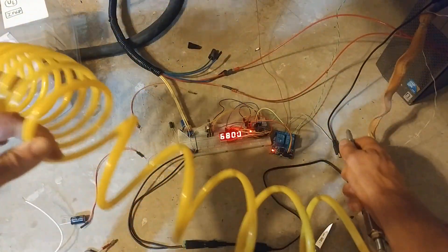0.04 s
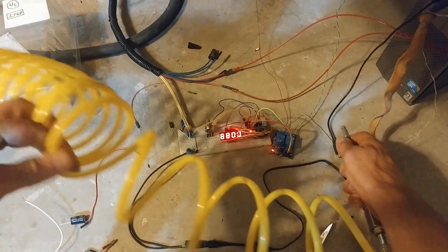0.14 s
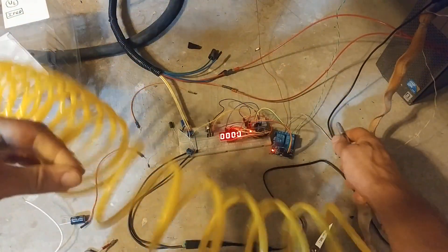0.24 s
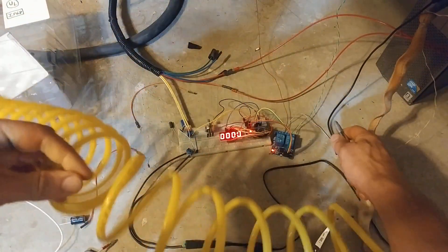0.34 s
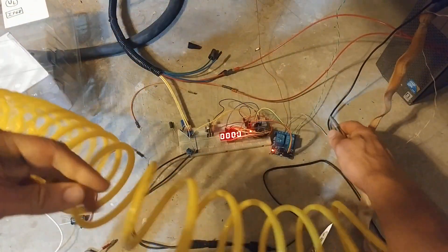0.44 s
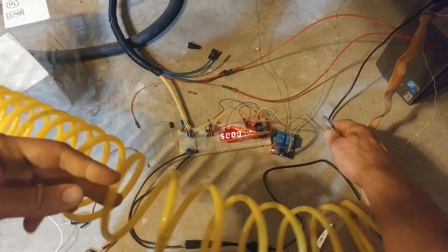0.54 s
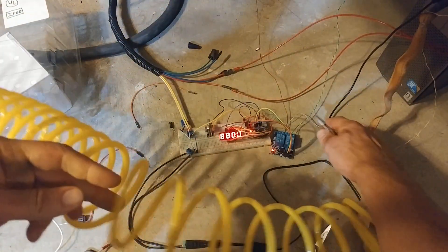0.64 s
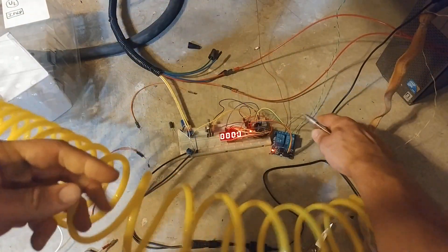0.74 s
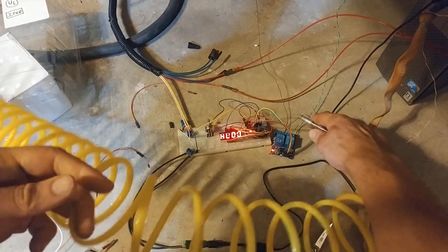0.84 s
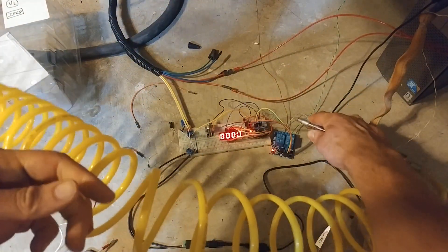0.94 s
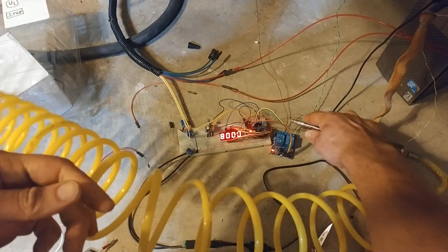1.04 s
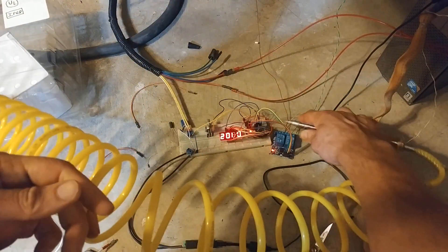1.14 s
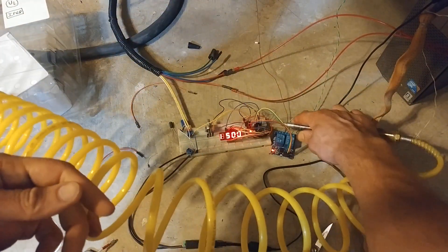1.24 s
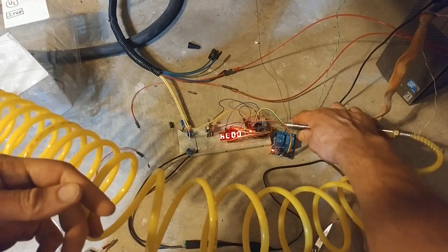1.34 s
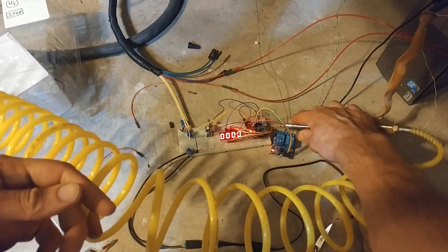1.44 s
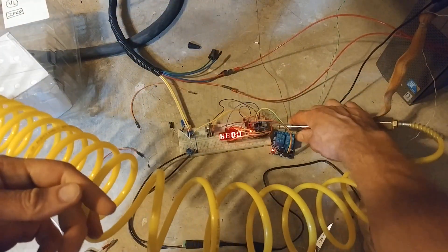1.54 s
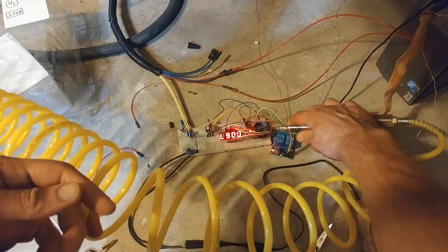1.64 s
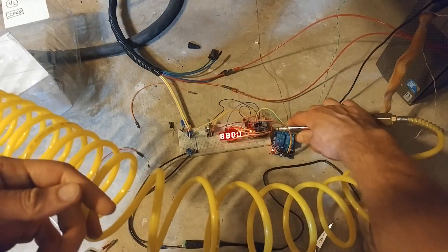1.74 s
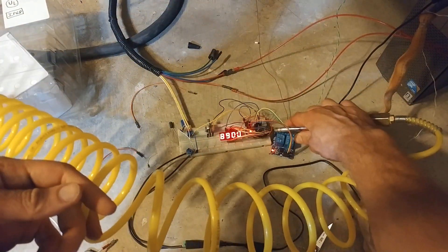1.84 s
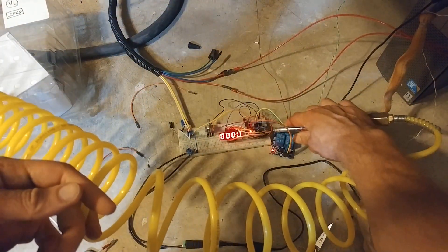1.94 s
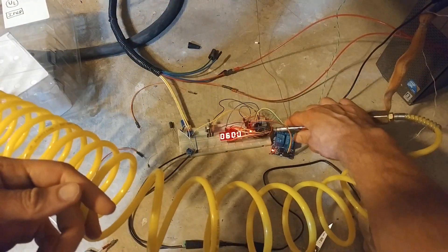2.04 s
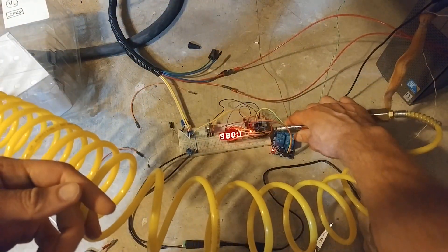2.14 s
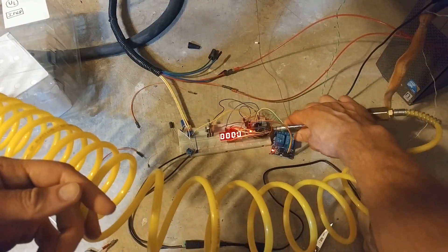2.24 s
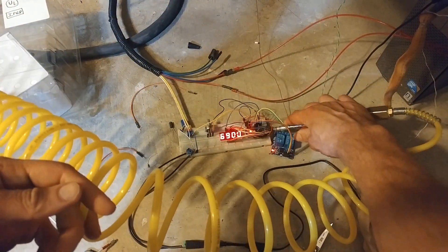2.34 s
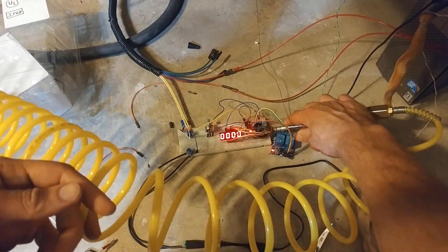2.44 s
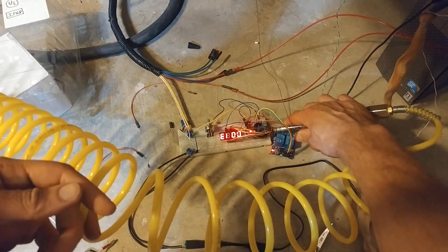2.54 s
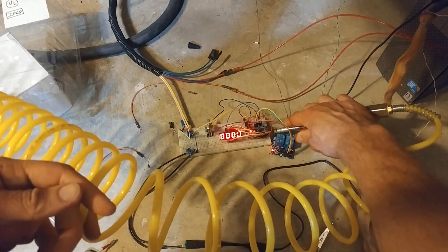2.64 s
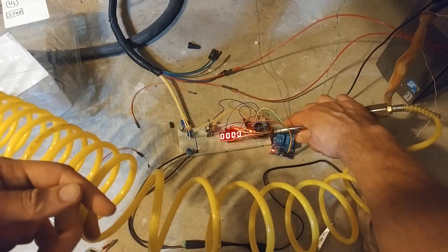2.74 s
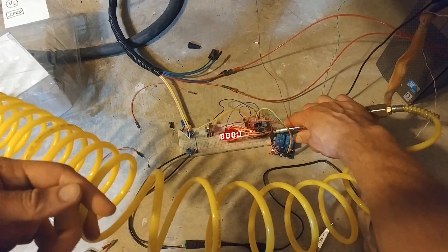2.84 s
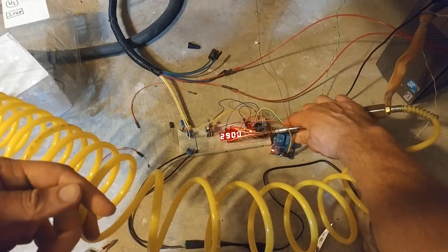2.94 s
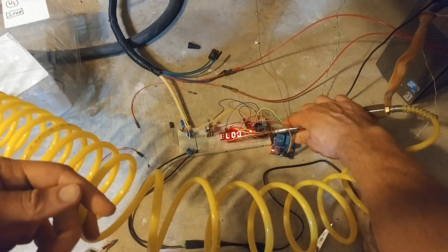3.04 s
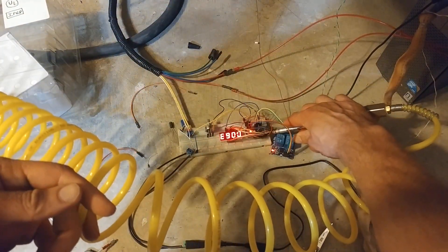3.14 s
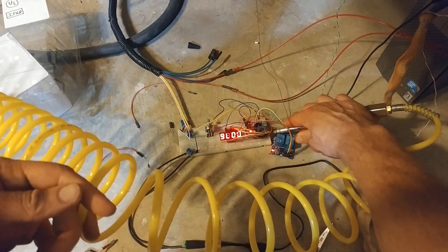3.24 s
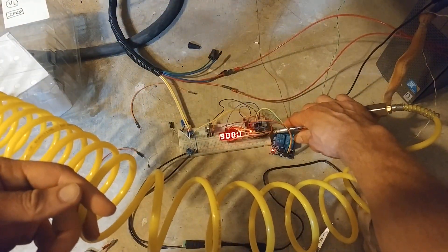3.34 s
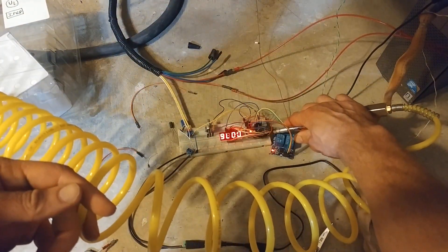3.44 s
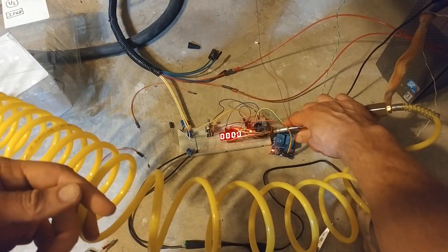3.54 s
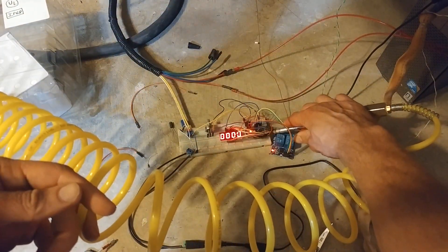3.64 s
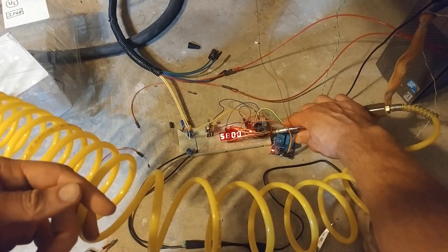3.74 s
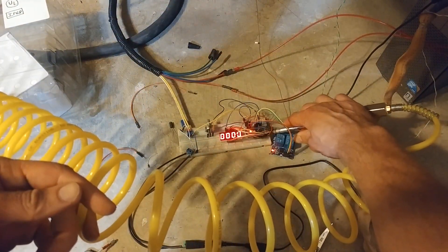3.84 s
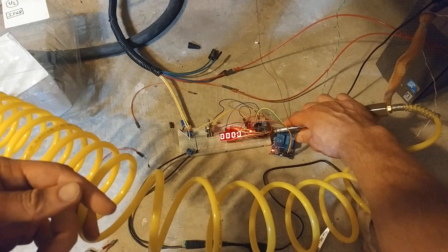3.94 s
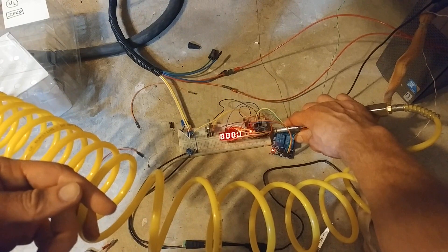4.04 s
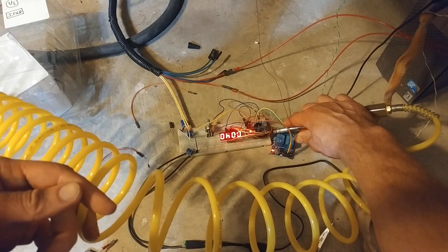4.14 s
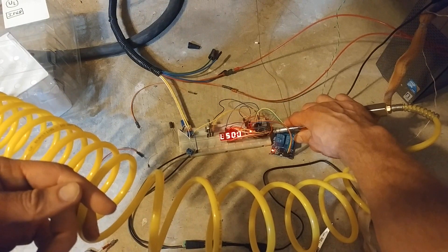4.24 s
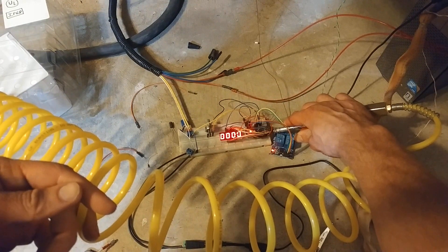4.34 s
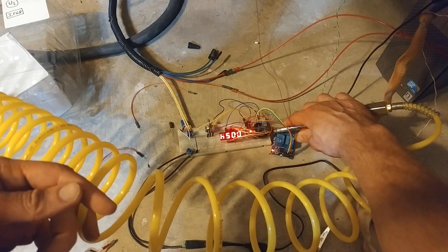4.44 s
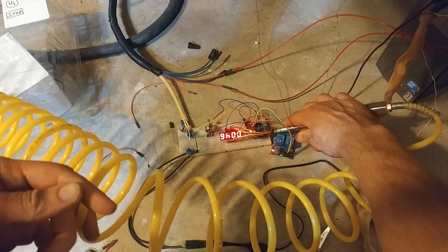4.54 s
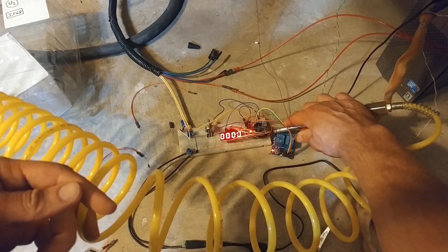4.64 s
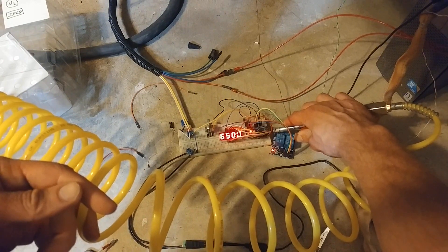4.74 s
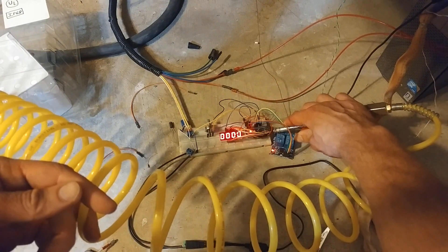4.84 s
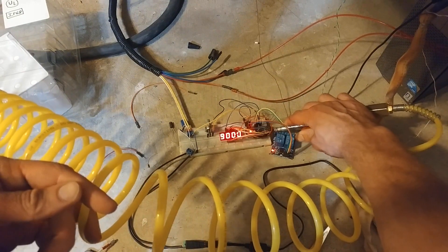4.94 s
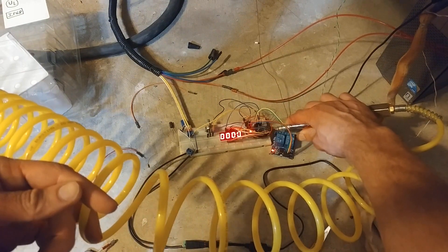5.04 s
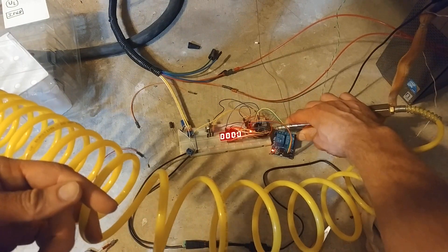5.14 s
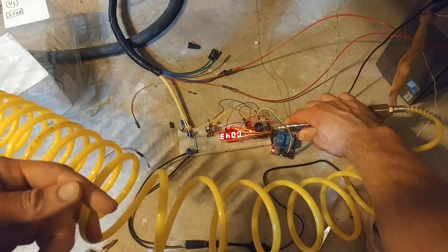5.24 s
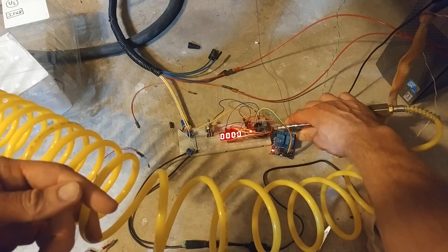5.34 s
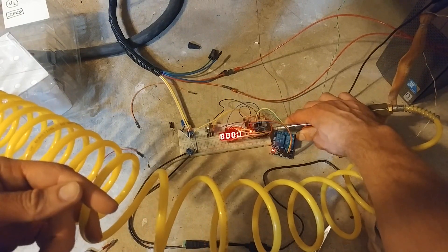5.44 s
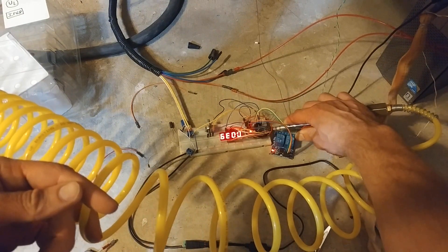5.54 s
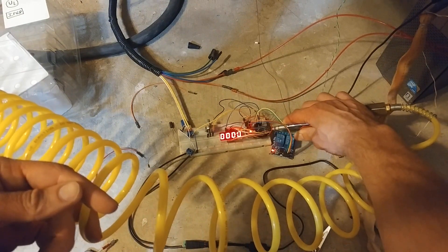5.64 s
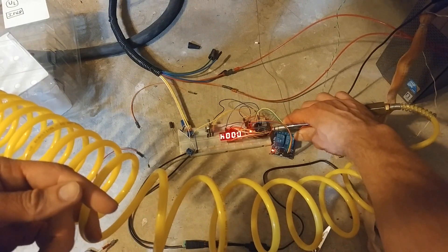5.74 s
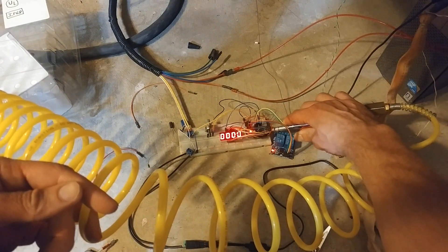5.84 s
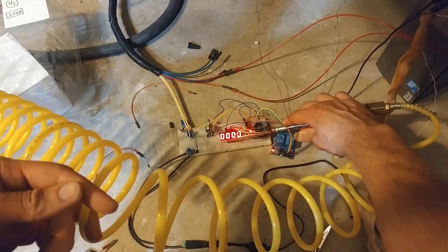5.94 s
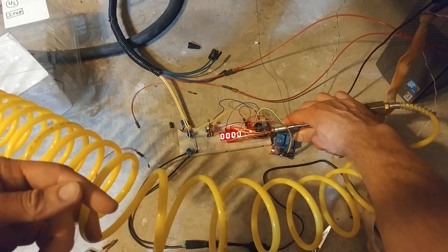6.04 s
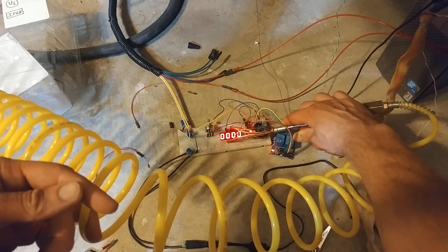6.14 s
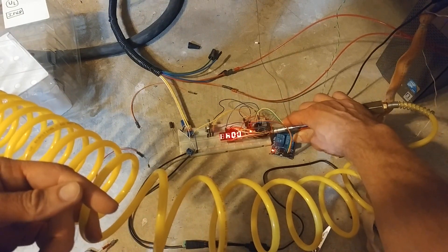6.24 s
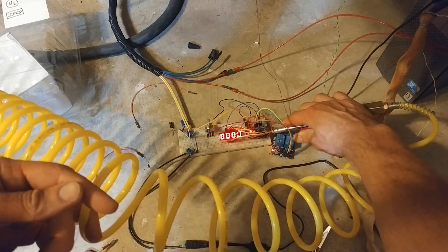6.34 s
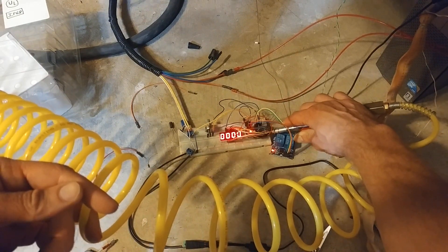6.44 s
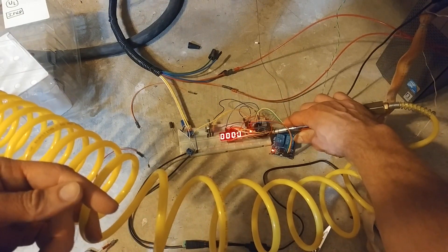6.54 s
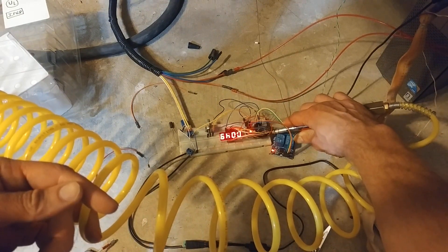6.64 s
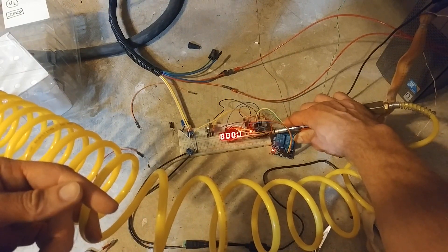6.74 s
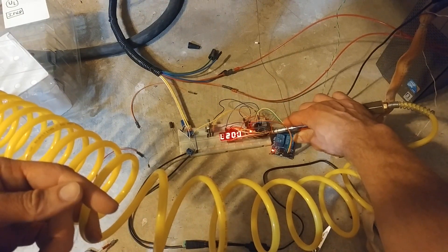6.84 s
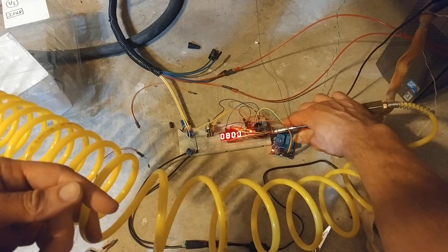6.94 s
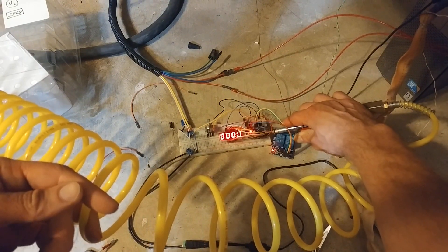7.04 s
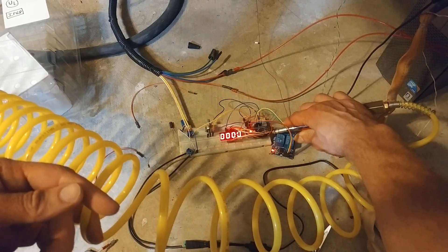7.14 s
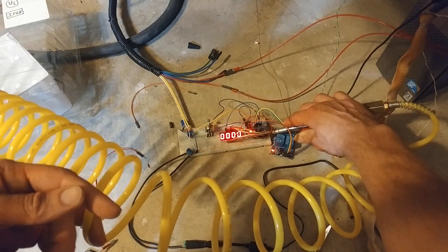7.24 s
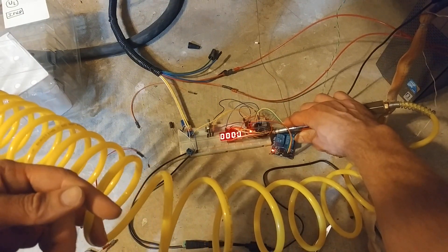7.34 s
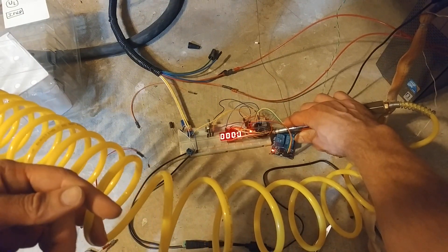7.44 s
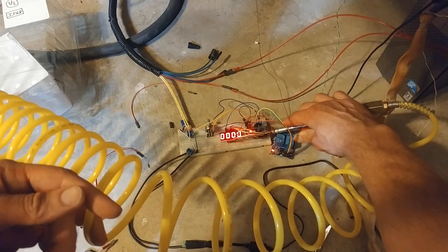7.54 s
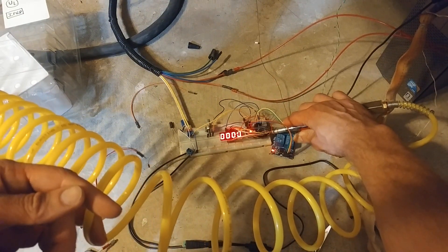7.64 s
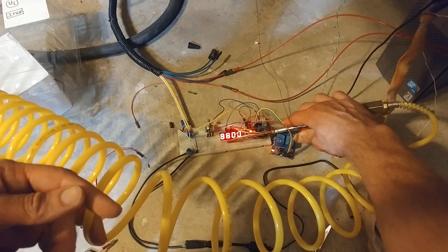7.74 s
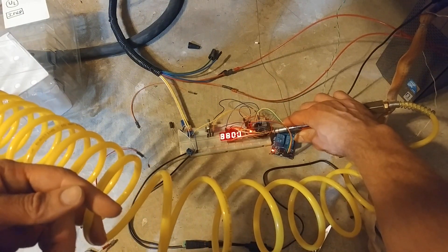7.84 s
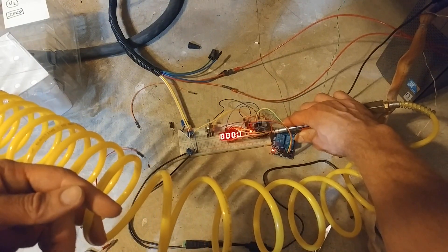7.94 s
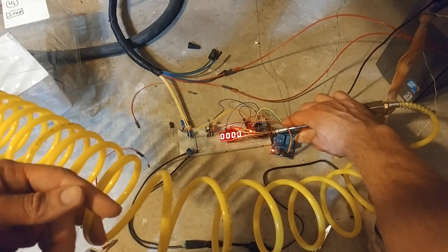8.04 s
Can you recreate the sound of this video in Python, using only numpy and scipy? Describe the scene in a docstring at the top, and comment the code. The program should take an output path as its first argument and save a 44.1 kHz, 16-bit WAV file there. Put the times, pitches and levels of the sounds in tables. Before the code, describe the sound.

Close, high air hiss from a blow gun, starting with a blast and hose thumps, then surging and fluttering over a circuit board.

```python
"""A jet of air from a blow gun hisses in the open, then is brought up to a circuit board,
where it breaks on the parts, roars, spits and sings in the gaps.
As the gun is opened over the workbench, its valve ticks and its coiled hose thumps.
A faint leak, a machine hum and the rumble of the room lie underneath. It is all heard from close by."""
import sys
import numpy as np
from scipy import signal
from scipy.fft import rfft, irfft
from scipy.io import wavfile
from scipy.ndimage import uniform_filter1d, map_coordinates

SR = 44100
rng = np.random.default_rng(int(sys.argv[2]) if len(sys.argv) > 2 else 0)


def wav_out(sig):
    """Save sig, one row per channel (or a flat mono array), as 16-bit PCM at SR to the path in sys.argv[1]."""
    wavfile.write(sys.argv[1], SR, np.round(np.clip(np.atleast_2d(sig).T, -1, 1) * 32767).astype(np.int16))


N = 356328
TIME = np.arange(N) / SR
FREQS = np.fft.rfftfreq(N, 1 / SR)
OPEN_S, LAND_S, PARTS_S = 0.098, 1.35, 1.68  # the air starts, meets the board, reaches the small parts


def from_db(db):
    """Turn decibels into a number to multiply by."""
    return 10 ** (np.asarray(db) / 20)


def unit_power(x):
    """Scale a signal so that its average power is 1."""
    return x / np.sqrt(np.mean(x ** 2) + 1e-20)


def curves(rows):
    """Join a table's points with straight lines: one curve for each column after the time."""
    times, *columns = np.transpose(rows)
    return [np.interp(TIME, times, column) for column in columns]


def noise(colour):
    """Steady noise shaped by rows of (pitch_hz, level_db), fading 20 dB an octave past their ends."""
    hz, db = np.transpose(colour)
    octave = np.log2(FREQS + 1)
    outside = np.abs(octave - np.clip(octave, np.log2(hz[0]), np.log2(hz[-1])))
    gain = from_db(np.interp(octave, np.log2(hz), db) - 20 * outside)
    return unit_power(irfft(rfft(rng.standard_normal(N)) * gain, N))


def drift(rate_hz):
    """A random wobble of about size 1; a higher rate makes it quicker."""
    return unit_power(irfft(rfft(rng.standard_normal(N)) / (1 + (FREQS / rate_hz) ** 2), N))


def retuned(x, ratio):
    """Slide a noise up or down in pitch by running it faster or slower."""
    return map_coordinates(x, [np.cumsum(ratio) % (N - 1)], order=3, mode="nearest")


def clicks(events):
    """One click for each row of (start_s, level_db)."""
    out = np.zeros(N)
    for start_s, level_db in events:
        out[round(start_s * SR)] += from_db(level_db)
    return out


def puffs(events, decay_s):
    """A loudness curve that jumps up at each event and dies away."""
    envelope = signal.lfilter([1], [1, -np.exp(-1 / (decay_s * SR))], clicks(events) + 1e-18)
    return uniform_filter1d(envelope, size=40)


def struck(hits, notes, vary_db):
    """Each hit rings all of an object's notes, which fade 60 dB in ring_s; hard hits are brighter."""
    out = np.zeros(N)
    start_s, hit_db, hardness = np.transpose(hits)
    chance = rng.standard_normal((len(hits), len(notes)))
    for k, (hz, note_db, ring_s) in enumerate(notes):
        level_db = hit_db + note_db + hardness * np.log2(hz / notes[0][0]) + vary_db * chance[:, k]
        taps = clicks(zip(start_s, level_db)) + 1e-18
        fade, angle = from_db(-60 / (ring_s * SR)), 2 * np.pi * hz / SR
        out += (-1) ** k * signal.lfilter([0, np.sin(angle)], [1, -2 * fade * np.cos(angle), fade ** 2], taps)
    return out


def room_echoes(x, echo_db, ring_s):
    """Add a wash of quickly dying echoes from the bench and the walls."""
    t = TIME[:SR // 2]
    tail = rng.standard_normal(len(t)) * from_db(-60 * t / ring_s) * (t > .001)
    response = from_db(echo_db) * tail / np.linalg.norm(tail)
    response[0] = 1
    return signal.fftconvolve(x, response / np.linalg.norm(response))[:N]


# Tone colour of the room's rumble and of the leak: pitch_hz, level_db
RUMBLE_COLOUR = [(20, 1.5), (40, -0.5), (85, 0.5), (130, -0.5), (200, -5), (240, -1.5), (320, 1.5),
                 (380, 0), (480, -6), (800, -13.5), (1500, -12.5), (2200, -18.5), (3300, -48), (12000, -32)]
LEAK_COLOUR = [(3000, -8.5), (4700, -11.5), (6400, 0), (8200, -7), (10000, -19), (13000, -41)]
# The notes a machine hums: pitch_hz, level_db
HUM_NOTES = [(59.5, -89), (260, -72.5), (355, -82)]
def workshop(rumble_db, leak_db, waver_hz):
    """A slowly fading room rumble, a slight leak of air and a wavering machine hum."""
    hum = np.zeros(N)
    for hz, db in HUM_NOTES:
        phase = 2 * np.pi * np.cumsum(hz + waver_hz * drift(3.9)) / SR
        hum += from_db(db) * np.sqrt(2) * np.sin(phase)
    rumble = from_db(rumble_db - 0.7 * TIME) * noise(RUMBLE_COLOUR)
    return rumble + from_db(leak_db) * noise(LEAK_COLOUR) + hum


# Knocks as the hose jerks: start_s, level_db, hardness_db_per_octave
HOSE_KNOCKS = [(0.13, -34, -3.5), (0.149, -37.5, -7), (0.177, -43, 1), (0.213, -56, 0), (0.258, -58, -1),
               (0.431, -50, 0), (0.529, -41.5, -0.5), (0.535, -48, 7), (0.643, -53, 3), (0.751, -58, 4),
               (0.967, -52.5, 1)]
# The notes of the hose on the bench: pitch_hz, level_db, ring_s
HOSE_NOTES = [(298, -11, 0.054), (354, -2.5, 0.064), (584, -14, .03), (873, -5.5, 0.024),
              (1274, -10.5, 0.032), (1510, -17, .03)]
# Tone colour of the coils slapping: pitch_hz, level_db
SLAP_COLOUR = [(150, -20), (350, 15), (600, -10), (1000, -1), (1600, -4), (2400, -3), (4000, -28)]
def hose(slap_db, rustle_db):
    """The coils slap together with a short hollow ring and rustle on as they settle."""
    knocks = [(start_s, level_db) for start_s, level_db, _ in HOSE_KNOCKS]
    slap = from_db(slap_db) * puffs(knocks, decay_s=.006)
    rustle = from_db(rustle_db) * puffs(knocks, decay_s=.06)
    return (slap + rustle) * noise(SLAP_COLOUR) + struck(HOSE_KNOCKS, HOSE_NOTES, vary_db=-1.0)


# Ticks as the trigger is pulled: start_s, level_db, hardness_db_per_octave
VALVE_TICKS = [(0.095, -38, 4), (0.104, -42, 2)]
# The notes of the valve: pitch_hz, level_db, ring_s
VALVE_NOTES = [(3426, -17, 0.081), (6250, -4, 0.013), (6460, -3.5, 0.028), (9400, -18, .04)]
def valve():
    """The trigger valve ticks open and rings briefly."""
    return struck(VALVE_TICKS, VALVE_NOTES, vary_db=3.0)


def breathy_note(pitch_hz, level_db, width_hz):
    """Swirling air sounds a note: a narrow band of noise that fades in over a second."""
    phase = 2 * np.pi * np.cumsum(pitch_hz) / SR
    tone = unit_power(drift(width_hz) * np.cos(phase) + drift(width_hz) * np.sin(phase))
    return tone * from_db(level_db) * np.clip(TIME - OPEN_S, 0, 1)


def hollow_note(jet_db, surge_db, narrowing):
    """A hollow between the parts sings: surges raise its note, a narrower gap lowers and weakens it."""
    narrower_percent = 100 * (narrowing - 1)
    pitch_hz = (4308 + 22 * surge_db) * narrowing ** -1.3
    level_db = jet_db - 14 + 0.43 * surge_db - 1.46 * narrower_percent
    return breathy_note(pitch_hz, level_db, width_hz=400)


# The note of a narrow gap: time_s, pitch_hz, level_db (compared with the jet)
GAP_NOTE = [(0.9, 6702, -7), (1.2, 6698, -0.5), (1.4, 7046, 3.5), (1.8, 6761, 0), (2.2, 6718, -5.5),
            (3.4, 6993, -2.5), (4.5, 6896, -5), (5.6, 7118, -1.5), (6.8, 7224, -2.3), (8.0, 7209, -1.5)]
def singing_gap(jet_db):
    """The jet sings in a gap. Also gives the narrowing: above 1 when the note is higher than average."""
    pitch_hz, level_db = curves(GAP_NOTE)
    return breathy_note(pitch_hz, jet_db + level_db, width_hz=440), pitch_hz / pitch_hz.mean()


# The nozzle coming down to the bench: time_s, height_m
NOZZLE_HEIGHT = [(0.1, .31), (0.45, 0.249), (0.8, 0.22), (1.05, 0.19), (1.4, 0.056)]
def nozzle_path(lowest_db):
    """The nozzle's height and the level of its steady flow, 4 dB quieter at twice the height."""
    height_m, = curves(NOZZLE_HEIGHT)
    return height_m, lowest_db - 4 * np.log2(height_m / height_m.min())


# Tone colour of the first blast and of the steady flow: pitch_hz, level_db
BLAST_COLOUR = [(150, -17.5), (700, -24), (1400, -19), (2000, -20.5), (3100, -19), (4000, -12), (4800, -9),
                (5600, -1), (7200, 1), (8300, -1), (9900, -8.5), (11400, -22), (12900, -30), (16000, -30)]
FLOW_COLOUR = [(500, -13), (1500, -23), (2650, -31), (3000, -18.5), (3800, -20), (4450, -18), (5200, -5.5),
               (5900, -4), (7200, 0.5), (8400, -1.5), (9900, -11), (11000, -22), (12700, -34), (16000, -31)]
def free_jet(height_m, flow_db, blast_db, echo_db):
    """Pressure stored in the hose leaves as a blast, then a smooth flow that dies at the board."""
    rise_s, hold_s, drain_db_per_s = 0.033, 0.1, 45
    end_s, end_db_per_s = 1.455, 450
    age_s = TIME - OPEN_S
    opening = np.clip(age_s / rise_s, 0, 1)
    blast = from_db(blast_db - drain_db_per_s * np.maximum(age_s - rise_s - hold_s, 0))
    flow = from_db(flow_db - end_db_per_s * np.clip(TIME - end_s, 0, 1))
    jet = opening * (blast * noise(BLAST_COLOUR) + flow * noise(FLOW_COLOUR))
    delay_s = 2 * height_m / 343  # to the bench and back; as this shrinks, the hiss sweeps
    echo = from_db(echo_db) * np.interp(TIME - delay_s, TIME, jet)
    swirl = from_db(-0.14 * drift(60))
    return (jet + echo) * swirl


# The jet catching sharp edges: start_s, level_db
EDGE_SPURTS = [(1.372, -28), (1.824, -21), (1.9635, -16), (2.415, -19), (2.7982, -20), (3.1858, -20),
               (4.036, -17), (4.1261, -25.5), (4.8156, -26), (4.9313, -31), (5.1094, -27), (6.389, -18),
               (6.5865, -29)]
def spurts(gain_db):
    """The loudness curve of the short puffs that fly off the edges."""
    return from_db(gain_db) * puffs(EDGE_SPURTS, decay_s=0.0075)


# How squarely the jet hits the board, heard as its hiss between surges: time_s, level_db
AIM = [(1.3, -48.5), (1.47, -40), (1.72, -38), (2.02, -35.5), (2.25, -36.5), (3.95, -37.5), (5.0, -35.5),
       (5.35, -38.5), (5.8, -39), (6.3, -40.5), (6.6, -36.5), (7.25, -36), (8.08, -38.5)]
# The jet swinging onto a part: start_s, length_s, roar_lift_db, hiss_lift_db
SURGES = [(1.396, 0.065, 4.5, 0), (1.549, 0.211, 9, 2.5), (1.78, 0.12, 6, 2.5), (1.924, 0.18, 1.5, 1.5),
          (2.58, .32, 5, 3), (3.176, .09, 3.5, 1.5), (3.33, 0.36, 1.5, 0.6), (4.067, 0.21, 3, 1.9),
          (4.41, .36, 2, 1.5), (5.078, .18, 3.5, 1.5), (5.39, 0.16, 2.7, -0.5), (5.926, .07, 2.1, 2),
          (6.355, 0.059, 8.5, 5.5), (6.674, 0.11, 4.5, 1.5), (6.819, 0.091, 5, 2.5), (7.015, 0.11, 4, 1.5),
          (7.768, 0.038, 6.5, 2.5)]
def aim_and_surges(rise_s, fall_s):
    """Each surge swells, holds and falls back. Gives the hiss level, roar level and the roar's lift."""
    aim_db, = curves(AIM)
    surge_db, hiss_db = np.zeros(N), aim_db.copy()
    for start_s, length_s, roar_lift_db, hiss_lift_db in SURGES:
        age_s = TIME - start_s
        swell = np.clip(np.minimum(age_s / rise_s, 1 - (age_s - length_s) / fall_s), 0, 1)
        surge_db += roar_lift_db * swell
        hiss_db += hiss_lift_db * swell
    return hiss_db, aim_db - 6 + surge_db, surge_db


# Tone colours of the jet on the board, from low to high: pitch_hz, level_db
RUSH_COLOUR = [(200, -34), (350, -3.5), (520, -10), (780, -7.5), (980, -5.5), (1180, 0.5), (1560, 1),
               (1780, -4), (2020, -7), (2300, 0.5), (2680, -4.5), (3050, 3.5), (3600, 0), (4300, -6)]
ROAR_COLOUR = [(2400, -23.5), (2750, -19), (2950, -9.5), (3300, -6), (3560, -6), (3900, -3.5), (4200, 1),
               (4550, 1), (4830, -1), (5020, -3), (5450, -7), (5730, -2), (6000, -6.5), (6900, -24)]
HISS_COLOUR = [(5200, -9), (5950, -9.5), (6350, -0.5), (6700, -4.5), (7100, -2.5), (7450, -2.5),
               (7750, -2.5), (8000, -1.5), (8600, -3.5), (9000, -6.5), (9250, -9), (9550, -10),
               (9900, -28.5), (12300, -53)]
SIZZLE_COLOUR = [(8800, -17), (9800, 0.5), (10400, 4), (10950, 3), (11500, -3.5), (12000, -4), (12500, -33),
                 (14000, -44)]
FIZZ_COLOUR = [(11000, -24), (12400, -6), (13100, 6), (13800, 5), (14350, 4), (15150, 8), (15500, 1),
               (16000, 4.5)]
# The rise and fall of the hollow rush under the hand: time_s, level_db
RUSH_LEVELS = [(1.34, -56.5), (1.7, -48), (1.81, -54.5), (2.13, -59.5), (2.35, -57.5), (3.82, -62.5),
               (6.43, -55), (6.5, -60), (7.1, -58), (7.23, -62), (7.72, -60), (8.08, -60.5)]
# The highest sounds, compared with the hiss: time_s, sizzle_db, fizz_db
TREBLE_LEVELS = [(1.7, -15.5, -24), (2.1, -14, -22), (2.52, -11, -18.5), (2.75, -15.5, -26.5),
                 (4.9, -14, -26), (5.12, -12.5, -21), (5.25, -17, -23.5), (5.55, -13, -21),
                 (5.85, -16.5, -26), (6.5, -17.5, -29), (7.1, -16, -26), (8.08, -18, -27.5)]
def jet_on_board(hiss_db, roar_db, narrowing, rush_gain_db, flutter_db, spit_db):
    """The jet flaps on the parts, so its roar, hiss and sizzle flutter and spit together."""
    land_db_per_s, parts_db_per_s = 168, 90
    rush_db, = curves(RUSH_LEVELS)
    sizzle_db, fizz_db = curves(TREBLE_LEVELS)
    # As the gap narrows, the hiss climbs and the roar sinks.
    hiss = from_db(hiss_db) * retuned(noise(HISS_COLOUR), narrowing ** .55)
    roar = from_db(roar_db) * retuned(noise(ROAR_COLOUR), narrowing ** -.4)
    on_parts = from_db(hiss_db + parts_db_per_s * np.minimum(TIME - PARTS_S, 0))
    treble = from_db(sizzle_db) * noise(SIZZLE_COLOUR) + from_db(fizz_db) * noise(FIZZ_COLOUR)
    rush = from_db(rush_db + rush_gain_db) * noise(RUSH_COLOUR)
    swirl = unit_power(from_db(flutter_db * drift(38) + spit_db * drift(750)))
    arrival = from_db(land_db_per_s * np.minimum(TIME - LAND_S, 0))  # swells as the nozzle closes in
    edges = spurts(gain_db=-16.5) * (noise(HISS_COLOUR) + 0.96 * noise(ROAR_COLOUR))
    return (swirl * (hiss + roar + on_parts * treble) + rush) * arrival + edges


def scene():
    """Jet, valve, hose and workshop together, the same in both channels."""
    height_m, flow_db = nozzle_path(lowest_db=-42)
    hiss_db, roar_db, surge_db = aim_and_surges(rise_s=.045, fall_s=.06)
    jet_db = np.where(TIME < LAND_S, flow_db, hiss_db)
    gap, narrowing = singing_gap(jet_db)
    air = gap + hollow_note(jet_db, surge_db, narrowing)
    air += free_jet(height_m, flow_db, blast_db=-33.5, echo_db=-15.5)
    air += jet_on_board(hiss_db, roar_db, narrowing, rush_gain_db=4.0, flutter_db=0.26, spit_db=0.5)
    mono = hose(slap_db=-13.5, rustle_db=-17.5)
    mono += room_echoes(air + valve(), echo_db=-10, ring_s=0.11)
    mono += workshop(rumble_db=-63.5, leak_db=-66.5, waver_hz=1.62)
    return np.stack([mono, mono])


def record(dry):
    """Cut away the very highest treble, above 15800 Hz."""
    return signal.sosfilt(signal.ellip(12, .1, 80, 15800, fs=SR, output="sos"), dry)


dry = scene()
out = record(dry)
wav_out(out)
```